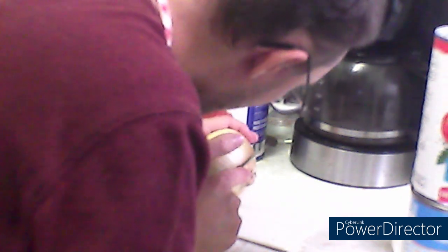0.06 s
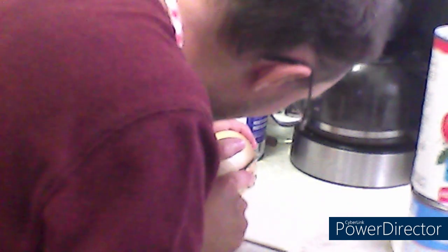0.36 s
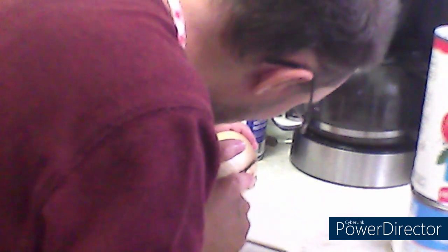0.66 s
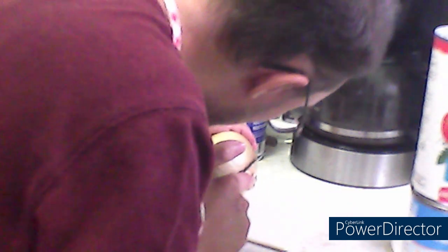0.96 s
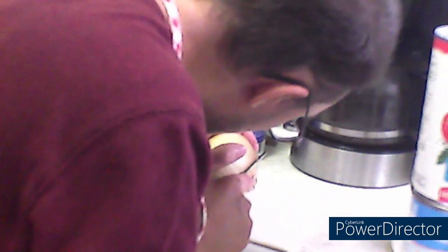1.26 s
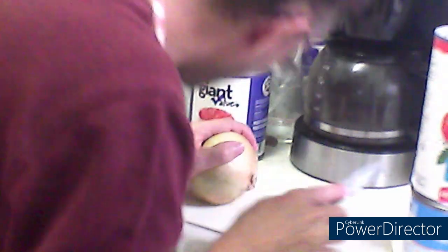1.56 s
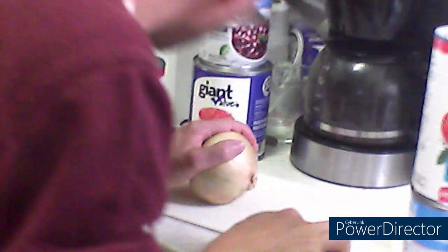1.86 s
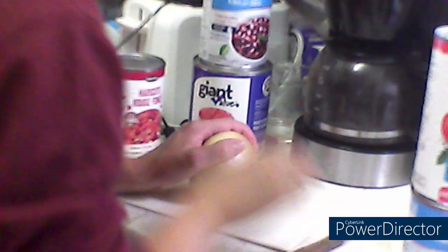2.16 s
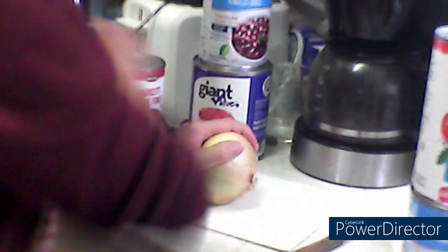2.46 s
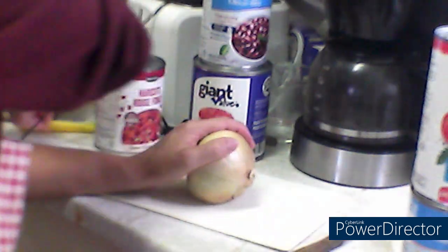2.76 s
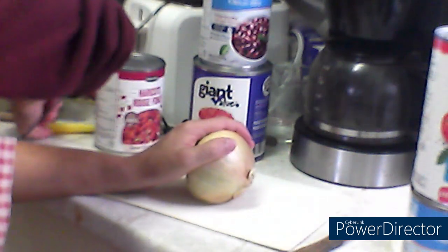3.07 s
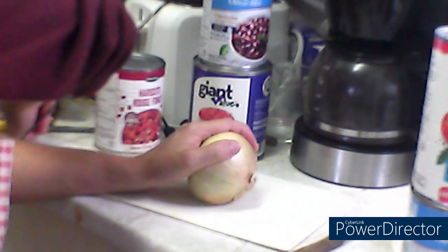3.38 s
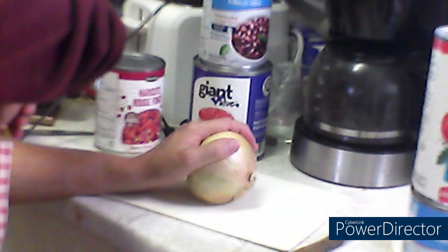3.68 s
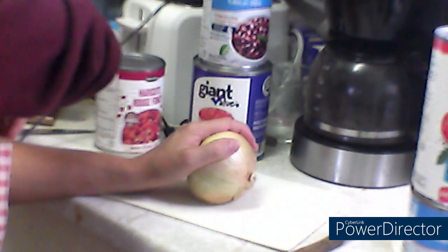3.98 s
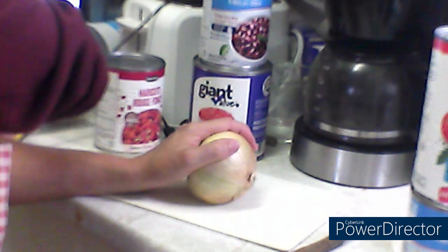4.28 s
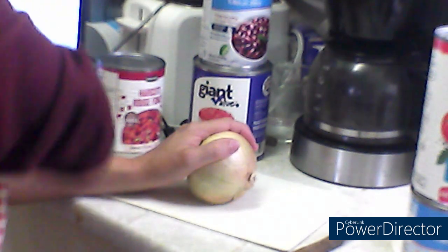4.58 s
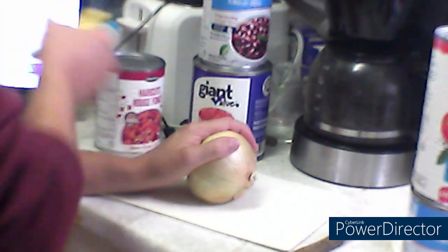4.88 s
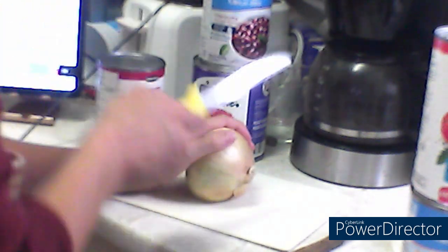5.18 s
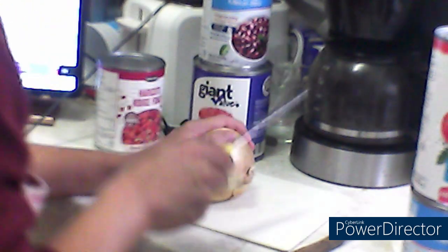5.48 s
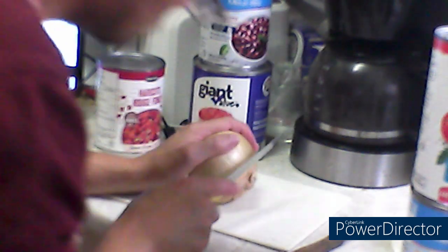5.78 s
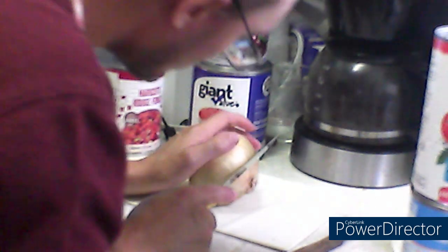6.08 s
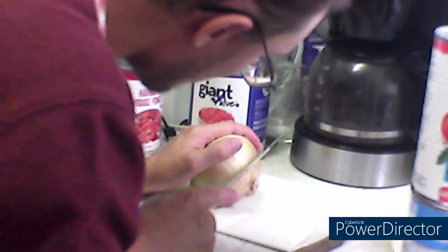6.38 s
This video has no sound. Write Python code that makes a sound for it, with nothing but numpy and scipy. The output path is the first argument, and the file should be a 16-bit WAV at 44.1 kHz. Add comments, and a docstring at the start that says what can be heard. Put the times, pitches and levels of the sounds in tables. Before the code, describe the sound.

A fan hums throughout as one microphone picks up the tiny snaps of an onion being peeled. The loudest sound follows: a knife clattering onto a board, ringing briefly in the small kitchen. Things then knock and scrape on the counter as another knife is pulled free, ending in two bright steel clinks. Faint, thin electrical beeps come in, and the dry skin starts crackling quietly again.

```python
"""Dry onion skin crackles and snaps under a blade, in trains of tiny catches, over a humming fan.
The knife is put down hard: it bounces, and knife, board and counter ring together.
A second knife is dragged out from among other things, sticking and slipping; it knocks about,
its steel blade clinks twice, and the crackle resumes. A thin electrical whine comes and goes.
The small kitchen rings briefly after each blow."""
import sys
import numpy as np
from scipy import signal
from scipy.fft import rfft, irfft
from scipy.io import wavfile

SR = 44100
rng = np.random.default_rng(int(sys.argv[2]) if len(sys.argv) > 2 else 0)


def generate_wav(signal):
    """Clip the signal to [-1, 1] and save it as 16-bit WAV at the path in sys.argv[1]."""
    frames = np.transpose(np.atleast_2d(signal))
    scaled = np.clip(frames, -1, 1) * 32767
    pcm = np.round(scaled).astype(np.int16)
    wavfile.write(sys.argv[1], SR, pcm)


N = 288286
RING_N = int(.7 * SR)
RING_TIME_S = np.arange(RING_N) / SR


def gain_of(db):
    """Decibels to amplitude."""
    return 10 ** (np.asarray(db) / 20)


def unit_rms(x):
    """Scales to rms 1."""
    return x / np.sqrt(np.mean(x ** 2) + 1e-20)


def unit_energy(x):
    """Scales to energy 1."""
    return x / np.linalg.norm(x)


def at_level(db, sound):
    """Scales a short sound to the energy of db held for 10 ms."""
    return gain_of(db) * np.sqrt(SR / 100) * unit_energy(sound)


def curve_at(points, hz):
    """Interpolates (frequency, value) points over log frequency."""
    point_hz, value = np.transpose(points)
    return np.interp(np.log(hz + 1), np.log(point_hz + 1), value)


def tilt(hz, db_per_oct):
    """Spectral slope in dB, pivoting at 1400 Hz."""
    return db_per_oct * np.log2(np.clip(hz, 300, 7000) / 1400)


def add(mix, start_s, sound):
    """Mixes a sound in at start_s."""
    part = mix[max(round(start_s * SR), 0):][:len(sound)]
    part += sound[:len(part)]


def drift(rate_hz):
    """Slow random wander, rms 1."""
    hz = np.fft.rfftfreq(N, 1 / SR)
    return unit_rms(irfft(rfft(rng.standard_normal(N)) / (1 + (hz / rate_hz) ** 4), N))


# Room decay: (frequency [Hz], t60 [s])
ROOM_DECAY = [(150, 0.5), (500, 0.36), (1500, 0.3), (4000, 0.29), (7000, 0.29)]


def kitchen(near_db, near_t60_s, room_db):
    """Impulse response: direct path, close reflections off counter, cans and wall, room tail."""
    near = rng.standard_normal(RING_N) * gain_of(-60 * RING_TIME_S / near_t60_s)
    hz, t, noise = signal.stft(rng.standard_normal(RING_N), SR, nperseg=256)
    decay = gain_of(-60 * t / curve_at(ROOM_DECAY, hz)[:, None])
    tail = signal.istft(noise * decay, SR, nperseg=256)[1][:RING_N]
    tail *= 1 - np.exp(-RING_TIME_S / .005)
    paths = gain_of(near_db) * unit_energy(near) + gain_of(room_db) * unit_energy(tail)
    paths[0] += 1
    return unit_energy(paths)


def click(spectrum, db_per_oct=0, thud_db=0, size=4096):
    """Minimum-phase pulse; harder contact tilts it upward, thud_db shelves the lows."""
    hz = abs(np.fft.fftfreq(size, 1 / SR))
    db = curve_at(spectrum, hz) + tilt(hz, db_per_oct) + thud_db / (1 + (hz / 850) ** 4)
    log_gain = np.log(gain_of(np.maximum(db, -90)))
    minimum_phase = np.exp(np.conj(signal.hilbert(log_gain)))
    return unit_energy(np.fft.ifft(minimum_phase).real[:size // 2])


def ring(modes, db_per_oct, rise_s):
    """Decaying modes that build up as the blow spreads through the object."""
    hz, db, t60_s = np.transpose(modes)[:, :, None]
    envelopes = gain_of(db + tilt(hz, db_per_oct) - 60 * RING_TIME_S / t60_s)
    waves = envelopes * np.sin(2 * np.pi * (hz * RING_TIME_S + rng.random(hz.shape)))
    return unit_energy(waves.sum(0) * (1 - np.exp(-RING_TIME_S / rise_s)))


def slips(size, per_s, spread_db):
    """Random train of tiny catches of uneven size."""
    catches = gain_of(spread_db * np.minimum(rng.exponential(1, size), 4)) * rng.choice([-1, 1], size)
    return catches * (rng.random(size) < per_s / SR)


def hand_pressure(strokes, attack_s, release_s):
    """Each stroke builds up, holds and dies away."""
    pressure = np.zeros(N)
    for start_s, length_s, db in strokes:
        t = np.arange(N) / SR - start_s
        release = np.exp(-np.maximum(t - length_s, 0) / release_s)
        pressure += gain_of(db) * np.clip(t / attack_s, 0, 1) * release
    return pressure


def rub(pressure, spectrum, per_s, spread_db, room_db):
    """Stick-slip friction under changing pressure."""
    force = pressure * unit_rms(slips(N, per_s, spread_db))
    body = signal.oaconvolve(force, click(spectrum))[:N]
    return signal.oaconvolve(body, kitchen(near_db=8, near_t60_s=.039, room_db=room_db))[:N]


def contacts(events, spectrum, per_s, first_db, thud_db=0, **room):
    """Rough contacts: a first catch, then a dying cluster of smaller ones."""
    out = np.zeros(N)
    for start_s, db, db_per_oct, decay_s in events:
        force = slips(RING_N, per_s, spread_db=4) * np.exp(-RING_TIME_S / decay_s)
        force[0] += gain_of(first_db)
        body = signal.fftconvolve(force, click(spectrum, db_per_oct, thud_db))[:RING_N]
        heard = signal.fftconvolve(body, kitchen(**room))[:RING_N]
        add(out, start_s, at_level(db, heard))
    return out


def strikes(events, spectrum, modes, ring_db, rise_s, **room):
    """Hard blows: a crack reflected about the kitchen, plus the struck object's ring."""
    out = np.zeros(N)
    for start_s, db, db_per_oct in events:
        crack = signal.fftconvolve(click(spectrum, db_per_oct), kitchen(**room))[:RING_N]
        ringing = gain_of(ring_db) * ring(modes, db_per_oct, rise_s)
        add(out, start_s, at_level(db, unit_energy(crack) + ringing))
    return out


# Air rush: (frequency [Hz], relative density [dB])
AIR_SPECTRUM = [(20, -18), (54, -8), (95, -11.5), (140, -4), (240, -3), (440, -2.5), (560, -8.5),
                (1000, -14), (1450, -15), (1750, -17.5), (2200, -27.5), (4200, -32.5), (6500, -38),
                (7400, -56.5)]
# Fan tones: (frequency [Hz], level [dB])
FAN_TONES = [(128, -66), (256, -60.5), (1129.5, -63)]


def fan(air_db=-50.5):
    """Steady rush of air with a few wavering tones."""
    air_gain = gain_of(curve_at(AIR_SPECTRUM, np.fft.rfftfreq(N, 1 / SR)))
    rush = unit_rms(irfft(rfft(rng.standard_normal(N)) * air_gain, N))
    out = gain_of(air_db + .4 * drift(rate_hz=3.5)) * rush
    for hz, db in FAN_TONES:
        cycles = np.cumsum(hz + 1.278 * drift(rate_hz=5.5)) / SR
        out += gain_of(db + 1.3 * drift(rate_hz=6)) * np.sqrt(2) * np.sin(2 * np.pi * cycles)
    return out


# Burst runs: (start [s], end [s], period [s])
WHINE_RUNS = [(4.262, 4.9, .304), (4.584, 4.7, .0215), (5.22, 6.2, .292)]


def whine(hz=3940, burst_s=.022, level_db=-67):
    """Electrical interference: dry bursts of one thin tone, each at a random phase."""
    out = np.zeros(N)
    t = np.arange(0, burst_s, 1 / SR)
    window = signal.windows.tukey(len(t), .4)
    for start_s, end_s, period_s in WHINE_RUNS:
        for onset_s in np.arange(start_s, end_s, period_s):
            add(out, onset_s, np.sin(2 * np.pi * (hz * t + rng.random())) * window)
    return gain_of(level_db) * np.sqrt(2) * out


# Dry skin response: (frequency [Hz], relative density [dB])
SKIN_SPECTRUM = [(600, -26), (1600, 6), (2200, -5), (3200, -10), (4200, 1.5), (4800, -8.5), (5500, -3.5),
                 (7200, -25.5)]
# Snaps: (time [s], level [dB], tilt [dB/oct])
SKIN_SNAPS = [(.060, -52.5, -1), (.101, -60, -2), (.257, -51.5, -2), (0.364, -54, -2.5), (.398, -58.5, 1),
              (0.426, -56.5, 1), (.702, -55, -3), (0.88, -50, -0.5), (1.181, -52.5, -5.5)]
# Crackle spells: (start [s], length [s], level [dB])
PEEL_STROKES = [(0, .45, -75), (.7, 0.52, -72), (5.25, .25, -71), (6.1, 0.47, -78)]


def onion_skin(tear_s=.011):
    """Dry skin snaps, tears on briefly, and crackles finely as the blade works at it."""
    tears = [(*snap, tear_s) for snap in SKIN_SNAPS]
    snaps = contacts(tears, SKIN_SPECTRUM, per_s=1200, first_db=8,
                     near_db=2, near_t60_s=.015, room_db=-4)
    pressure = hand_pressure(PEEL_STROKES, attack_s=.07, release_s=.15)
    return snaps + rub(pressure, SKIN_SPECTRUM, per_s=250, spread_db=5.5, room_db=-6)


# Taps on metal: (time [s], level [dB], pitch [Hz])
METAL_TAPS = [(2.779, -57, 4410), (3.094, -51, 4570), (3.524, -56.5, 4320), (4.934, -55, 2645),
              (5.056, -67, 3100), (6.422, -63, 4560)]


def metal_taps(spread=.055, t60_s=.1):
    """Thin metal rings in a cluster of modes, strongest near its pitch."""
    out = np.zeros(N)
    for start_s, db, hz in METAL_TAPS:
        cluster = [(hz * (1 + spread * u), -12 * abs(u), t60_s) for u in rng.uniform(-1.5, 1, size=12)]
        ringing = ring(cluster, db_per_oct=-3, rise_s=.001)
        heard = signal.fftconvolve(ringing, kitchen(near_db=1.5, near_t60_s=.038, room_db=-5))
        add(out, start_s, at_level(db, heard[:RING_N]))
    return out


# Scrape response: (frequency [Hz], relative density [dB])
DRAG_SPECTRUM = [(120, -48.5), (200, -13.5), (258, -12), (332, -26), (357, -12), (657, -3), (1030, -11.5),
                 (1540, -5.5), (2160, -13), (2510, -21.5), (4100, -32), (7000, -60.5), (9100, -86.5),
                 (15400, -120)]
# Drags: (start [s], length [s], level [dB])
DRAG_STROKES = [(2.772, 0.06, -35.5), (2.92, 0.65, -57), (3.92, 0.23, -60.5)]


def knife_drag():
    """The second knife scrapes over the counter as things shift around it."""
    pressure = hand_pressure(DRAG_STROKES, attack_s=.024, release_s=.025)
    return rub(pressure, DRAG_SPECTRUM, per_s=1500, spread_db=5, room_db=2.5)


# Counter response: (frequency [Hz], relative density [dB])
COUNTER_SPECTRUM = [(80, -47.5), (150, -19.5), (250, -21), (340, -7), (460, -6), (600, -5), (750, -6.5),
                    (950, -3), (1250, -3.5), (1830, -4), (2600, -16.5), (3400, -23), (4500, -22),
                    (5500, -27), (7400, -50)]
# Knocks: (time [s], level [dB], tilt [dB/oct], contact decay [s])
COUNTER_KNOCKS = [(2.797, -41.5, 1.5, 0.0086), (2.866, -41.5, 0, 0.0028), (3.007, -42.5, -3, 0.0044),
                  (3.088, -35, 1, 0.0054), (3.107, -34.5, 1, 0.0023), (3.166, -27.5, 0.5, 0.0086),
                  (3.191, -32, 0.5, 0.0041), (3.226, -33.5, -3, 0.0053), (3.258, -36.5, -.5, 0.012),
                  (3.367, -41.5, -7.5, 0.0065), (3.411, -46, 1.5, 0.025), (3.522, -54, 7.5, .008),
                  (3.561, -36.5, 0, 0.0068), (3.761, -50, 4, 0.0029), (4.198, -41, 0, 0.004),
                  (4.222, -34, -2.5, .01), (4.524, -48, 4.5, .012), (4.937, -47, -1, .018)]


def counter_knocks(settle_s=.011, heavy_db=-38.5):
    """An edge hits, then the weight settles with a duller knock; light things settle less."""
    events = []
    for start_s, db, db_per_oct, decay_s in COUNTER_KNOCKS:
        settle_db = db - 1 + 1.6 * min(db - heavy_db, 0)
        events.append((start_s, db, db_per_oct, decay_s))
        events.append((start_s + settle_s, settle_db, db_per_oct - 3.5, decay_s))
    return contacts(events, COUNTER_SPECTRUM, per_s=600, first_db=10, thud_db=-.5,
                    near_db=15, near_t60_s=.08, room_db=12.5)


# Dense blade response: (frequency [Hz], relative density [dB])
BLADE_SPECTRUM = [(100, -49), (200, -22), (430, -14.5), (750, -17), (1190, -17.5), (1500, -7), (1710, 0.5),
                  (1900, -16), (2350, -15.5), (2730, -31), (3080, -25.5), (4430, -32.5), (4850, -29),
                  (5300, -31.5), (7400, -49)]
# Blade modes: (frequency [Hz], relative level [dB], t60 [s])
BLADE_MODES = [(1580, -6, 0.15), (1550, -21, .15), (1650, 8.5, 0.062), (1726, -5.5, 0.18),
               (1770, -2, 0.067), (2094, -10.5, 0.24), (2230, -8, 0.11), (3020, -20, 0.29),
               (4720, -10.5, 0.053)]
# Clinks: (time [s], level [dB], step to second touch [dB])
BLADE_CLINKS = [(4.3018, -25.5, -2), (4.3555, -26.5, 0)]


def blade_clinks(chatter_s=.0075, db_per_oct=2):
    """Steel on steel, hard and bright; the blade springs back and touches again."""
    events = [(start_s + k * chatter_s, db + k * step_db, db_per_oct)
              for start_s, db, step_db in BLADE_CLINKS for k in range(2)]
    return strikes(events, BLADE_SPECTRUM, BLADE_MODES, ring_db=-2.5, rise_s=.00078,
                   near_db=10, near_t60_s=.045, room_db=14.5)


# Joint modes of knife, board and counter: (frequency [Hz], relative level [dB], t60 [s])
BOARD_MODES = [(158, -10, .38), (306, -7, .4), (428, -9, .4), (523, -4, .38), (582, -3, .4), (666, -5, .4),
               (885, -4, .33), (929, -2, .35), (1058, -4, .31), (1272, -4, .36), (1381, -2, .27),
               (1492, -1, .38), (1568, -3, .36), (1722, 0, .35), (1784, -3, .35), (1842, -1, .25),
               (1904, -4, .28), (2076, -5, .33), (2569, -5, .3), (3172, -5, .22), (3856, -12, .22),
               (4152, -3, .22), (4202, -5, .25), (4320, -8, .35)]


def counter_ring(sound, ring_db):
    """A sound on the counter plus the modes it excites."""
    ringing = signal.oaconvolve(sound, ring(BOARD_MODES, db_per_oct=-2, rise_s=.0013))[:N]
    return sound + gain_of(ring_db) * ringing


# Dense response of knife, board and counter: (frequency [Hz], relative density [dB])
BOARD_SPECTRUM = [(80, -40), (140, -29), (300, -14.5), (400, -13.5), (520, -6.5), (900, -8.5), (1200, -4.5),
                  (1750, -0.5), (2200, -15), (2600, -12.5), (3100, -13.5), (3400, -20.5), (4200, -8.5),
                  (4900, -17.5), (5600, -24.5), (7400, -41)]
# Tip, handle, flat at the first landing: (delay [s], level [dB], tilt [dB/oct])
LANDING_TOUCHES = [(0, -11, -1.5), (.0053, -8.5, 0.5), (0.0134, -22, 2)]


def knife_landing(land_s=1.7422, flight_s=.115, restitution=.71, step_db=-19, step_db_per_oct=-1.5):
    """The knife hits the board and bounces twice, each bounce shorter, weaker and duller."""
    landings_s = land_s + flight_s * (1 - restitution ** np.arange(3)) / (1 - restitution)
    events = [(start_s + delay_s, db + k * step_db, db_per_oct + k * step_db_per_oct)
              for k, start_s in enumerate(landings_s) for delay_s, db, db_per_oct in LANDING_TOUCHES]
    return strikes(events, BOARD_SPECTRUM, BOARD_MODES, ring_db=-7, rise_s=.0025,
                   near_db=14.5, near_t60_s=.045, room_db=11.5)


def scene():
    """All sources at one microphone."""
    knives = knife_landing() + blade_clinks()
    rummaging = counter_ring(counter_knocks() + knife_drag(), ring_db=-21) + metal_taps()
    return (knives + rummaging + onion_skin() + fan() + whine())[None]


def record(dry):
    """The microphone clips at full scale and cuts the top treble."""
    cutoff_hz = 7300
    lowpass = signal.firwin(301, cutoff_hz, window=("kaiser", 8), fs=SR)
    return signal.oaconvolve(np.clip(dry, -1, 1), lowpass[None], "same")


dry = scene()
out = record(dry)
generate_wav(out)
```